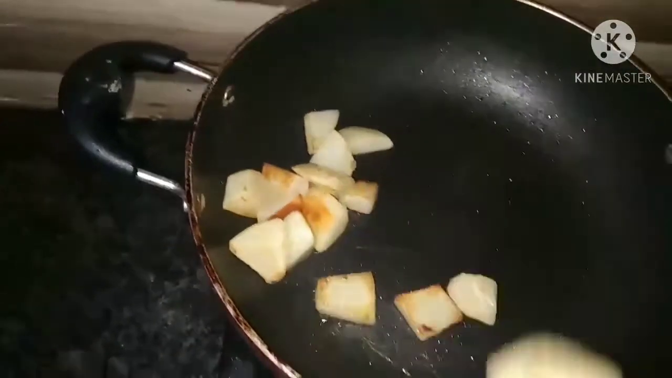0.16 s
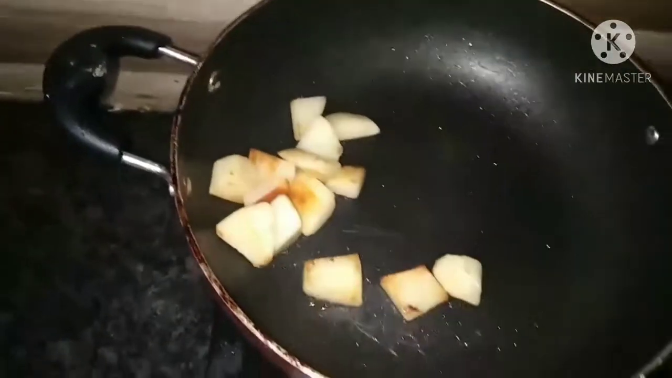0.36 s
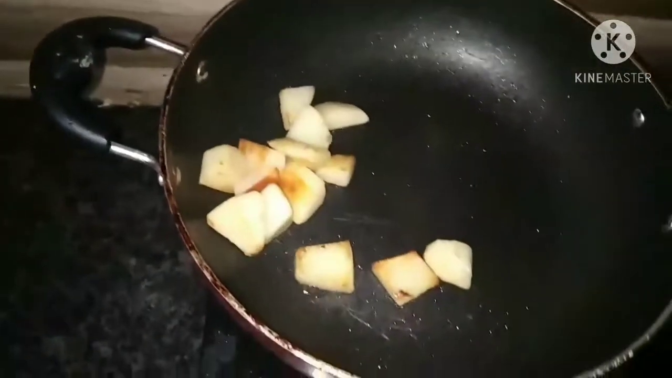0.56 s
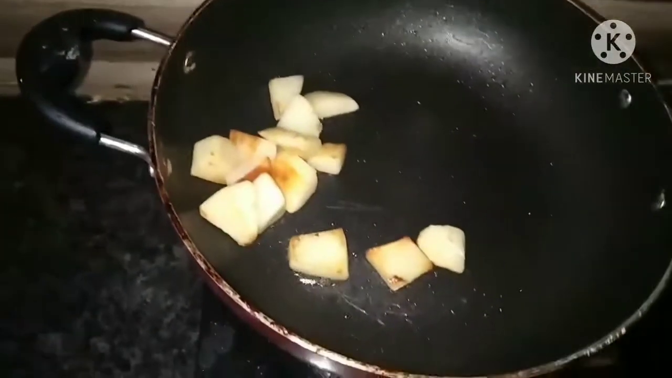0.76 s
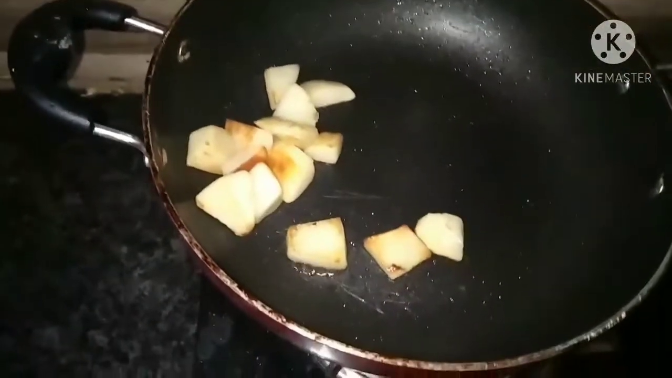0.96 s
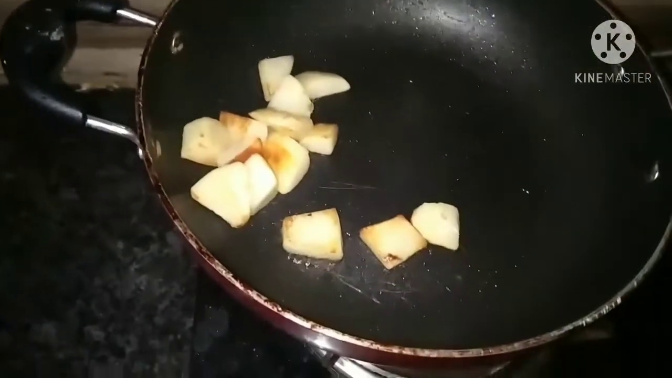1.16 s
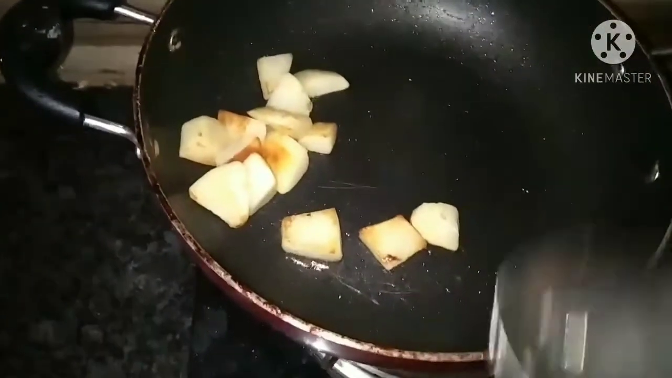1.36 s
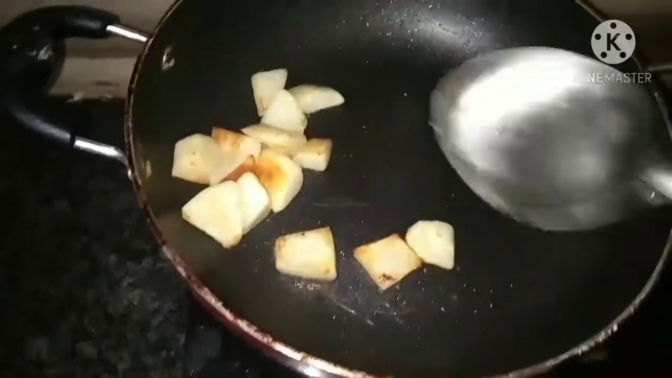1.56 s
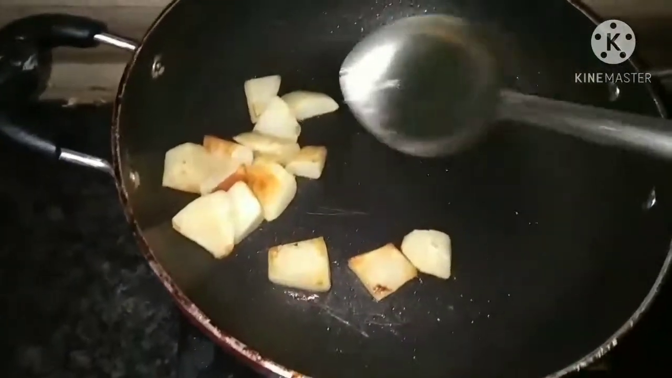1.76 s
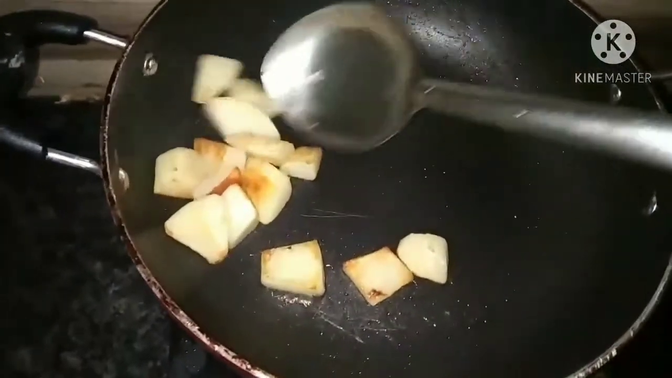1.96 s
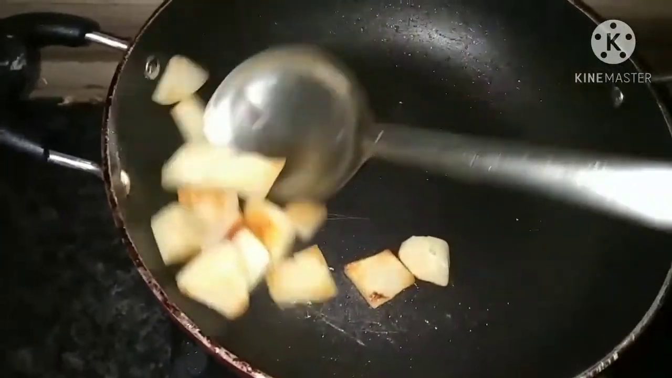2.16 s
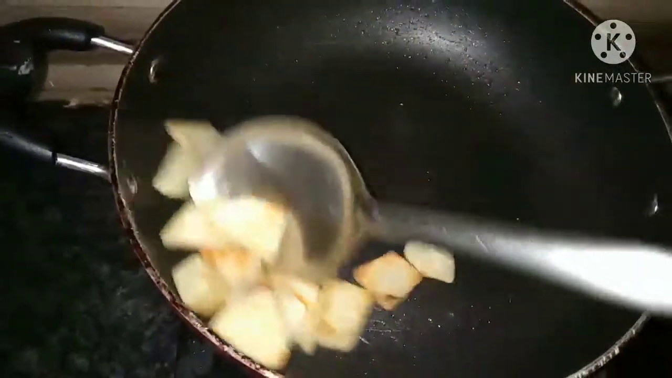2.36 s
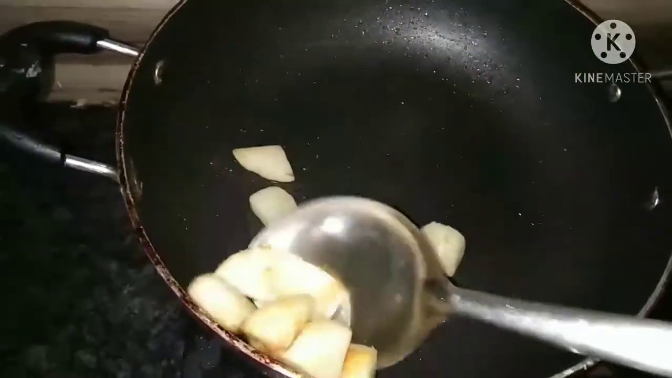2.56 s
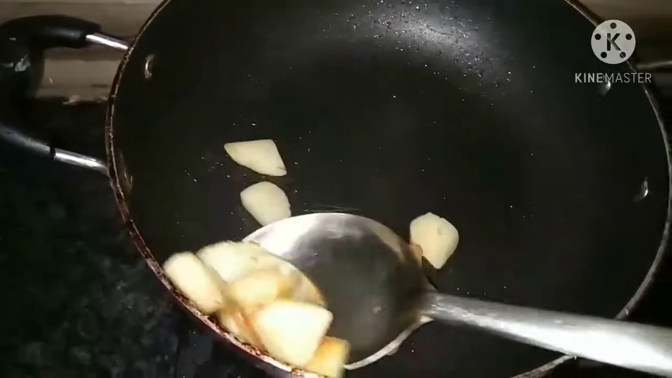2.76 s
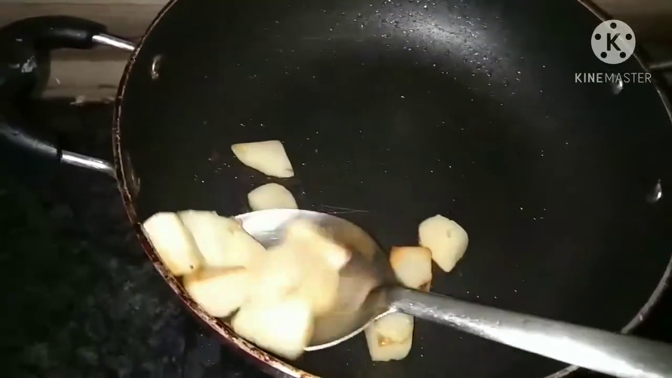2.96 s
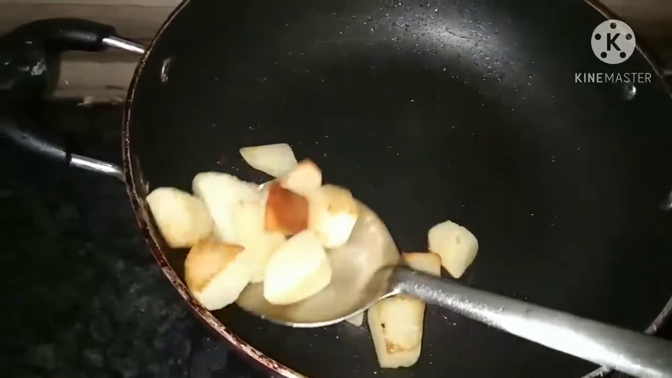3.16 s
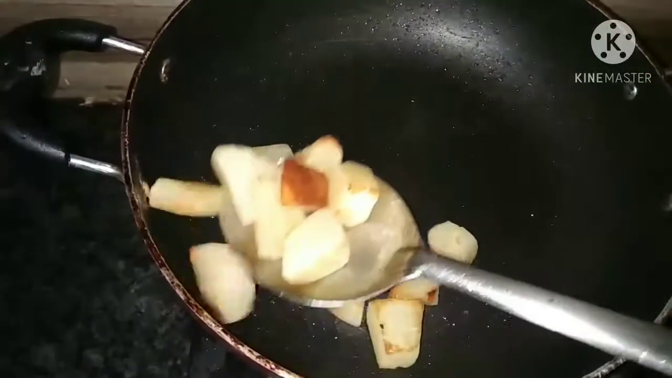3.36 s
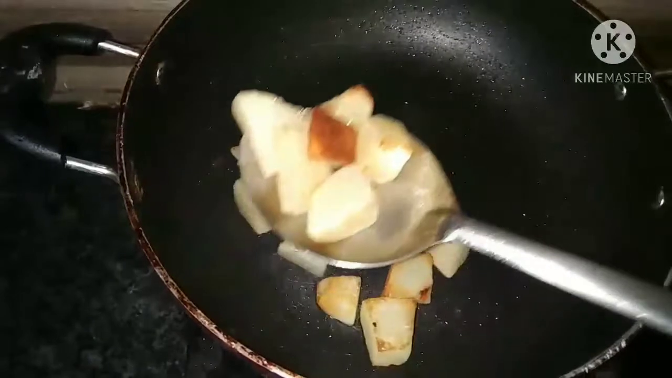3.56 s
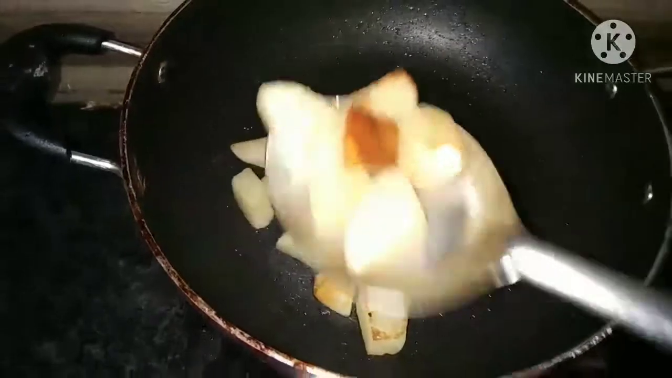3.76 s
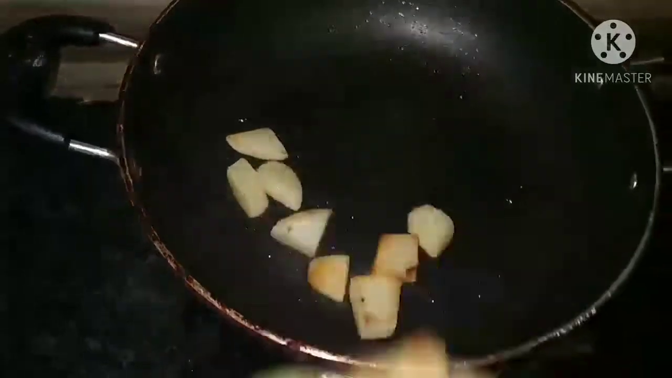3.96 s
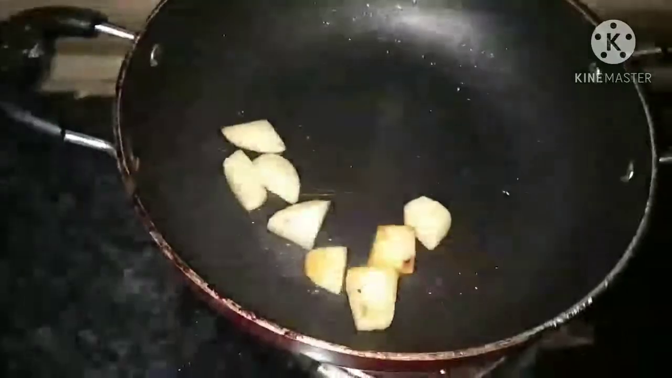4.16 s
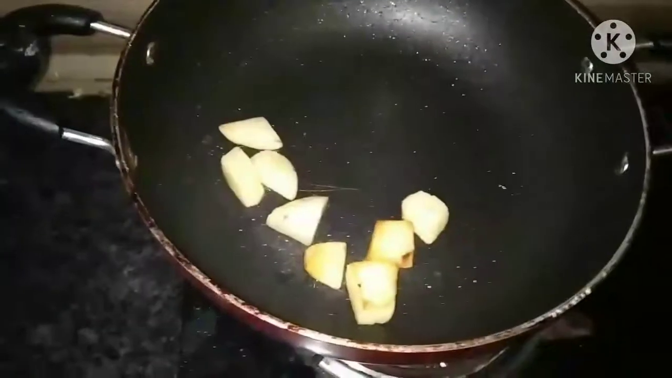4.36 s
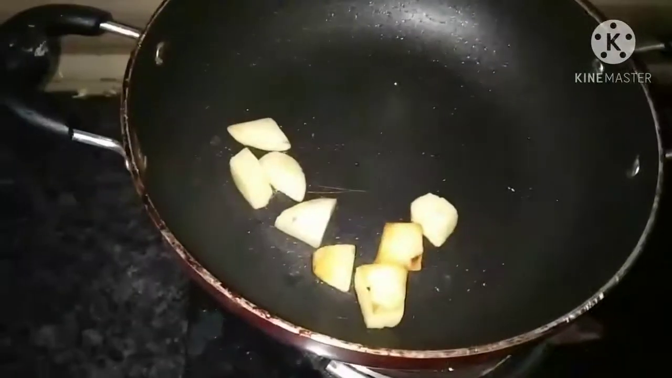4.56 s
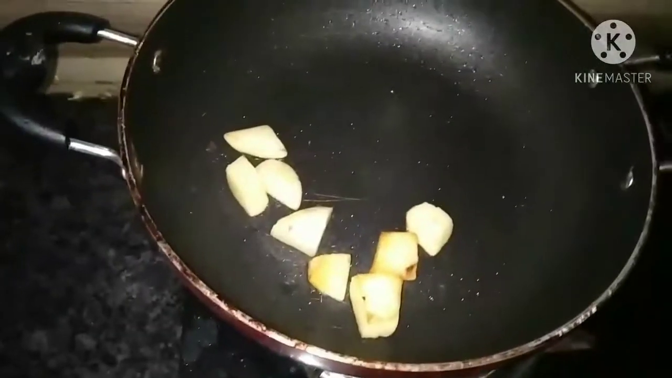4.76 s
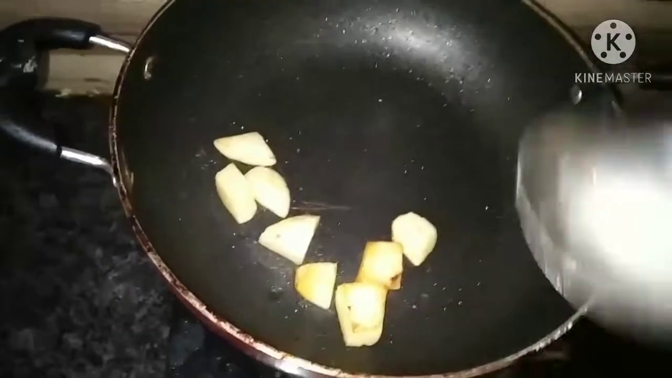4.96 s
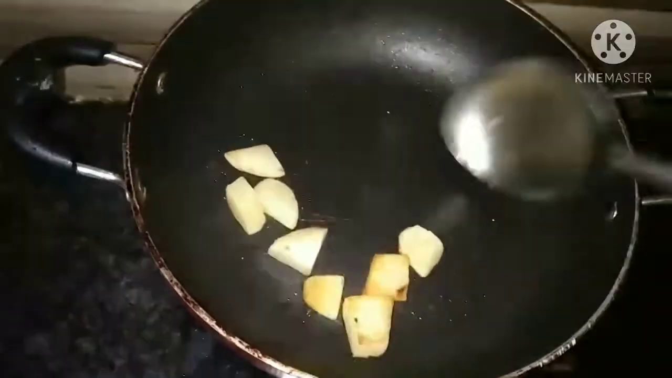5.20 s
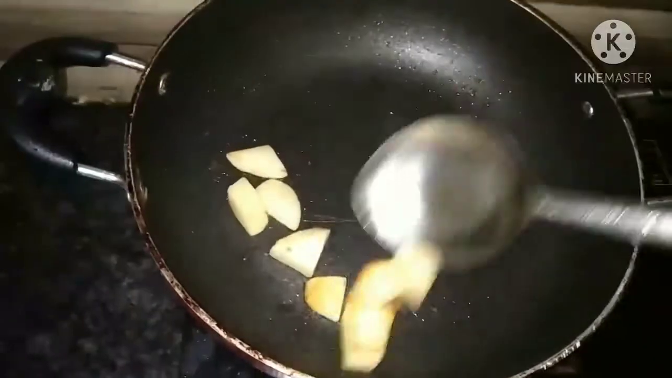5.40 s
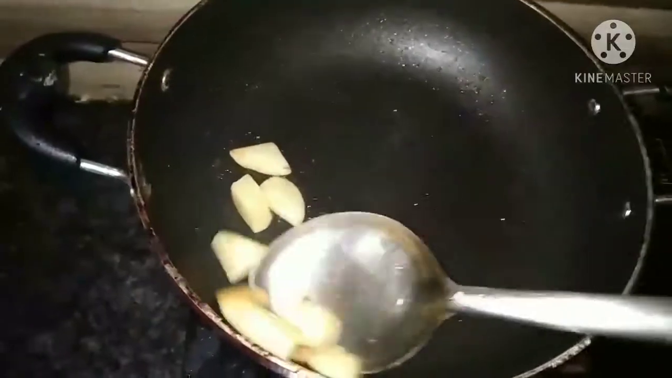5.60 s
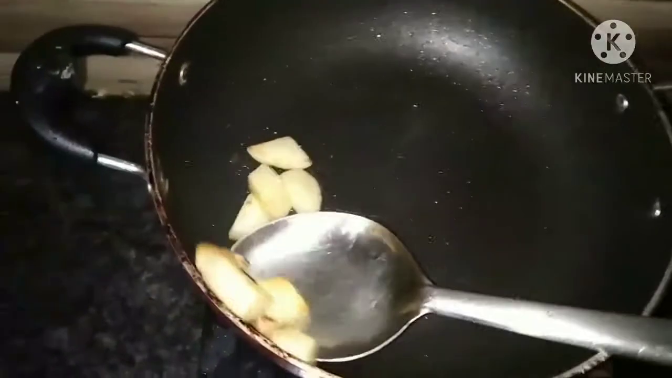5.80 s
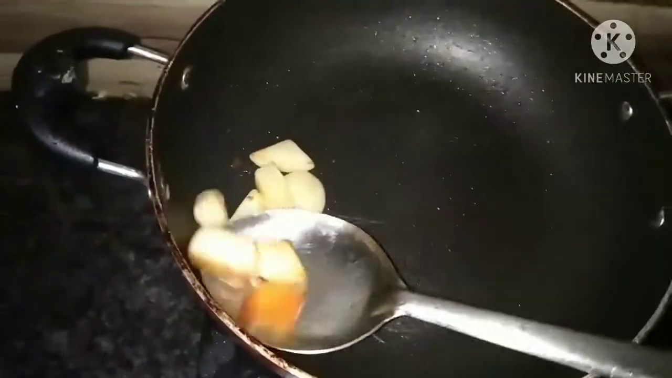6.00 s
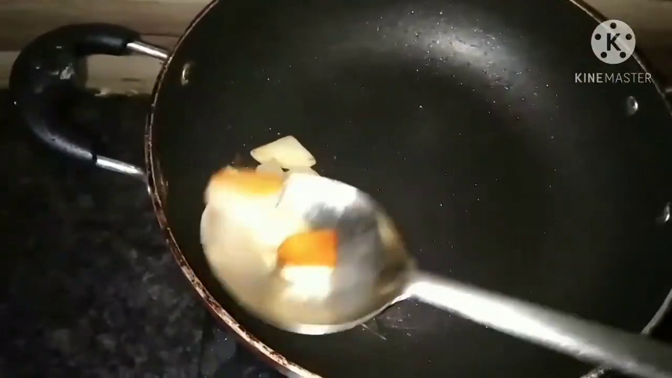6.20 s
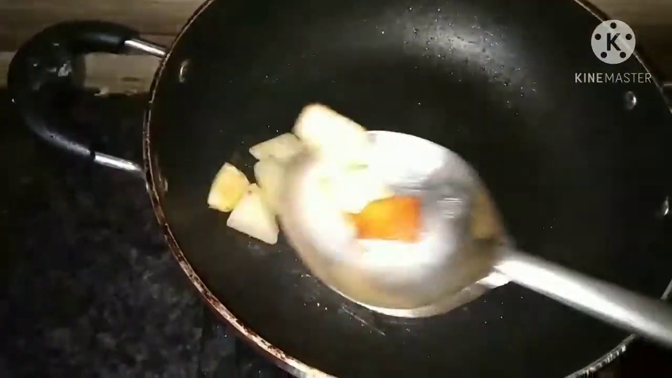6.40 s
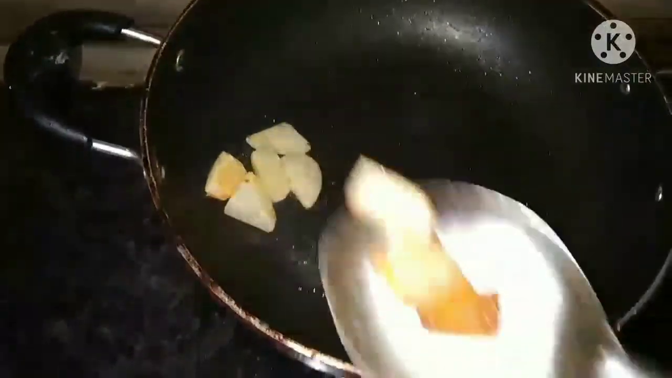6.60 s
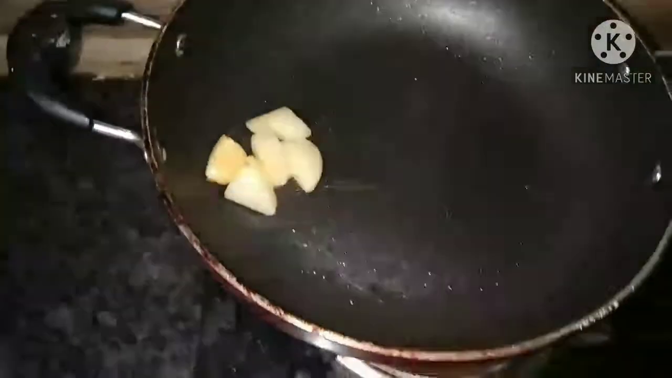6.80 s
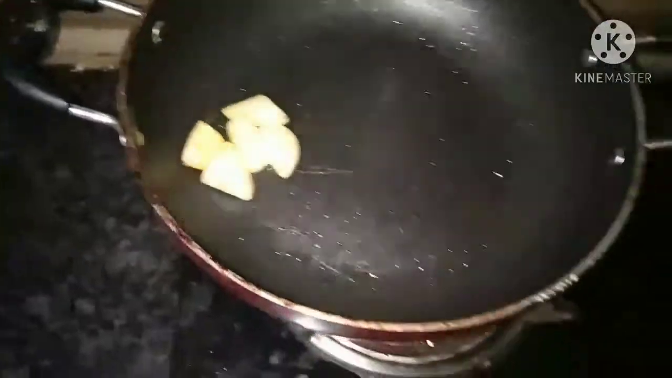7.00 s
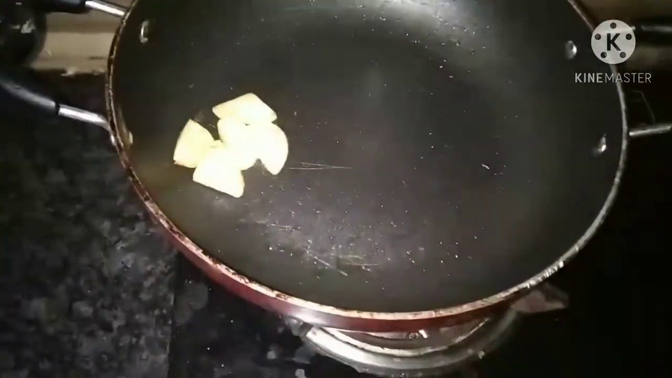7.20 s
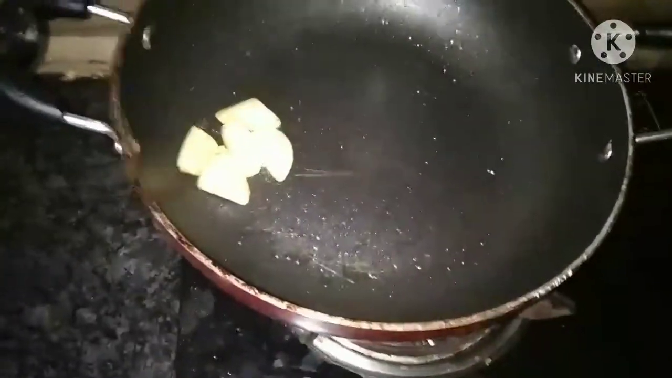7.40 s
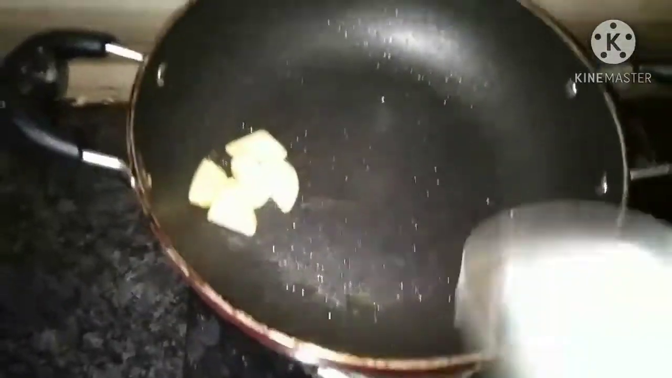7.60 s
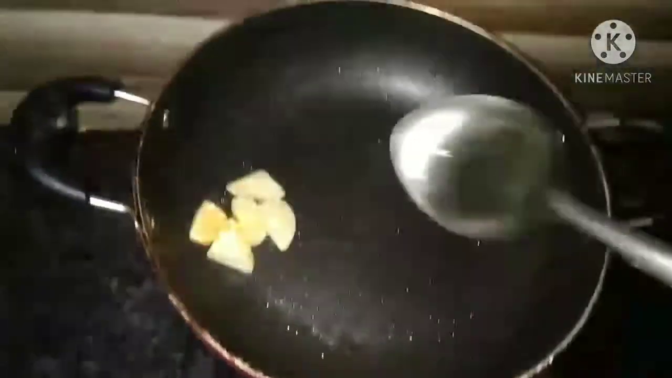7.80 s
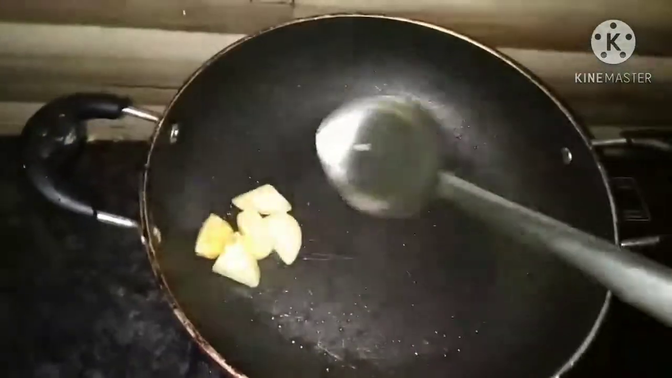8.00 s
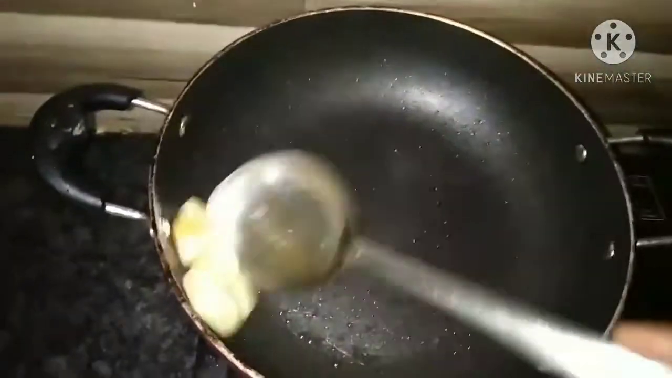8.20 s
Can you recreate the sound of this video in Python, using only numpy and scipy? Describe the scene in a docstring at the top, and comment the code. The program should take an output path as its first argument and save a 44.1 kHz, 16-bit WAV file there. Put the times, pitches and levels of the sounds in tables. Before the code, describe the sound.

Close to a wok in a small kitchen, potato pieces sizzle steadily over a faint low rumble. After soft bumps, a steel ladle knocks the pan, bounces and scrapes. Oil then spits in sharp cracks. The ladle strikes again with a rougher scrape, a faint high steam whistle sinks, the frying thins, and a last clank and scrape finish. Stereo, close microphone.

```python
"""Potato pieces sizzle in a wok: random clicks stand for bursting steam bubbles, over a low kitchen rumble.
Soft bumps come first, then at about 1.9 s a steel ladle lands, bounces and scrapes, ringing the pan's modes.
From about 3.5 s oil spits, each time a swelling hiss, a sharp crack and a spray of noise; at 5.3 s the ladle
lands again. At about 6.5 s leaking steam whistles, a sinking sine tone, and near 8 s the ladle lands once more.
Two microphone ports hear it all in stereo."""
import sys
import numpy as np
from scipy import signal
from scipy.fft import rfft, irfft
from scipy.io import wavfile
from scipy.ndimage import uniform_filter1d

SR = 44100
rng = np.random.default_rng(int(sys.argv[2]) if len(sys.argv) > 2 else 0)


def to_wav(s):
    """Save 16-bit WAV."""
    ch = np.atleast_2d(s).T  # columns
    pcm = np.round(np.clip(ch, -1, 1) * 32767)  # PCM
    wavfile.write(sys.argv[1], SR, pcm.astype(np.int16))


N = 363825
TIME = np.arange(N) / SR  # seconds


def undb(db):
    """Turn decibels into a plain gain."""
    return 10 ** (np.asarray(db) / 20)


def unit(x):
    """Scale a sound to an average strength (rms) of 1."""
    return x / np.sqrt(np.mean(x ** 2))


def colour(x, points, tilt_db=0., size=1024):
    """Filter through (Hz, dB) points without pre-echo; tilt_db is dB per octave, zero at 5000 Hz."""
    hz, db = np.transpose(points)
    octave = np.log2(np.maximum(np.arange(size // 2 + 1), .5) * SR / size)
    level_db = np.interp(octave, np.log2(hz + 1), db) + tilt_db * (octave - np.log2(5000))
    # folding the cepstrum (the transform of the log gain) puts all of the response after time zero
    cepstrum = irfft(np.log(undb(level_db)))
    cepstrum[1:size // 2] *= 2
    cepstrum[size // 2 + 1:] = 0
    response = irfft(np.exp(rfft(cepstrum)))
    filtered = signal.fftconvolve(np.atleast_2d(x), response[None], axes=1)
    return filtered[:, :x.shape[-1]].reshape(x.shape)


def band(x, lo_hz, hi_hz):
    """Keep the pitches between two limits."""
    return signal.sosfilt(signal.butter(2, [lo_hz, hi_hz], "band", fs=SR, output="sos"), x)


def curve(rows):
    """Gain that follows (s, dB) rows."""
    return undb(np.interp(TIME, *np.transpose(rows)))


def walk(rate):
    """A wandering random level: a new value every 1 / rate s, reached by a slide; spread near 1."""
    step = int(SR / rate)
    held = np.repeat(rng.standard_normal(N // step + 1), step)
    return 1.34 * uniform_filter1d(held, step)[:N]


def grains(rate, scatter_db):
    """Clicks at random moments, rate per second, a few much larger than the rest; rms 1."""
    hit = rng.random(N) < rate / SR
    return unit(hit * rng.standard_normal(N) * undb(scatter_db * rng.exponential(size=N)))


def strokes(start_s, hold_s, level_db, attack_s, t60_s):
    """Gain of events that rise, hold and die away by 60 dB in t60_s; their powers add."""
    power = np.zeros(N)
    for start, hold, db in zip(start_s, hold_s, level_db):
        t = TIME - start
        fade_db = 60 * np.maximum(t - attack_s - hold, 0) / t60_s
        power += (undb(db - fade_db) * np.clip(t / attack_s, 0, 1)) ** 2
    return np.sqrt(power)


# frying calms as pieces leave the pan and flares when they are stirred; relative levels: start_s, level_db
FRYING_LEVELS = [(0.0, -39.5), (2.57, -39), (3.01, -40), (3.33, -41), (3.63, -40), (4.52, -41), (5.08, -42),
                 (5.45, -39), (5.81, -41), (6.41, -45.5), (6.64, -44), (6.85, -45), (7.9, -47),
                 (8.25, -42.5)]
# tone of the bursting bubbles, also used for the spray of spits: pitch_hz, level_db (per Hz)
FRYING_TONE = [(940, -38.5), (1600, -8.5), (1840, -15.5), (2160, -8.5), (2660, -11), (2880, -7.5),
               (3170, -4), (4020, -7), (4380, -3), (4960, -9), (6620, -5.5), (8460, -0.5), (10200, -7),
               (13000, -8)]


def sizzle():
    """Thousands of tiny steam bubbles burst across the pan; part reaches both ports alike."""
    shared, left, right = (grains(9000, 0.33) * undb(0.93 * walk(40)) for _ in range(3))
    both = colour(np.array([shared + 2.12 * left, shared + 2.04 * right]), FRYING_TONE)
    unsteady = undb(2.5 + .5 * walk(6.6))
    return unit(both) * unsteady * curve(FRYING_LEVELS), left


# ways the pan and ladle ring together: pitch_hz, ring_s (time to fall 60 dB), level_db (relative)
RING_MODES = [(267, 0.33, -18), (374.7, 0.13, -10.5), (473, 0.02, -20), (565, 0.09, -12), (837.2, 0.14, -8),
              (877, 0.39, -17.5), (916, 0.22, -14), (1245, 0.036, -37), (1415, 0.083, -6),
              (1458, 0.067, -5), (1967, 0.039, -15), (2170, 0.032, -10.5), (2360, 0.076, -11),
              (2674, 0.02, -4), (2940, 0.024, -25), (3460, 0.013, -37), (3621, 0.063, -8.5),
              (3990, 0.044, -1.5), (4700, 0.14, -15.5), (5150, 0.073, -2), (5482, 0.073, -5.5),
              (6400, 0.06, -13), (7000, 0.026, -8), (7320, 0.073, -7.5), (7834, 0.052, -3),
              (8760, 0.046, -7), (9800, 0.052, -8.5), (9730, 0.044, -11.5), (11500, 0.048, -16),
              (13100, 0.065, -16)]
# pitches that split the modes into seven families: pitch_hz
FAMILY_LIMITS = [700, 1100, 1700, 2500, 3200, 6000]
# how hard the bubbles shake each family, lowest family first: level_db
BUBBLE_PUSH = [-28.5, -22.5, -18, -21.5, -15.5, -21, -15.5]


def metal(frying, bumps):
    """Blows, stick-slip scraping, tumbling pieces and the frying all drive the same ringing modes."""
    at, blows = blow_forces()
    rubbing = rubbing_forces(bumps)
    # no two blows start a mode alike
    scatter = np.exp((0.033 + 1j) * rng.standard_normal((len(at), len(RING_MODES))))
    ringing = np.zeros((2, N))
    for k, (hz, ring_s, db) in enumerate(RING_MODES):
        family = np.searchsorted(FAMILY_LIMITS, hz)
        pole = np.exp((2j * np.pi * hz - np.log(1000) / ring_s) / SR)
        # the moving contact feeds the fine upper modes weakly and by turns
        contact_db = (1.3 + 0.6 * family) * walk(22) - 5.9 * (hz > 3200)
        steady = rubbing[family] * undb(contact_db) + undb(BUBBLE_PUSH[family]) * frying
        force = np.sqrt(2 - 2 * abs(pole) ** 2) * steady.astype(complex)
        force[at] += blows[family] * scatter[:, k]
        ring = undb(db) * signal.lfilter([1], [1, -pole], force)
        # higher modes radiate in finer patterns, so the ports hear them at different phases
        turn = np.exp(.7j * (-1) ** k * np.sqrt(hz / 1000))
        ringing += np.array([ring * turn, ring]).imag
    clack = clacks()
    clack = band(clack, 780, 7000) + band(clack, 6400, 14000) * undb(-7.0)
    # a small pan radiates hardly any bass
    return band(ringing + clack + rasp(rubbing), 395, 16000)


# ladle blows and bounces; the spot struck favours some modes:
# start_s, level_db, low_extra_db (below 1100 Hz), middle_extra_db (1700-3200 Hz), high_extra_db (above 3200 Hz)
LADLE_BLOWS = [(1.875, -5, -4.5, -3, -11.5), (1.925, -23.5, 6, 2, -15), (2.012, -26, 1, -2, -17),
               (2.295, -34, -12, 5, -5), (3.055, -31.5, -12, 1, -16), (5.348, -3, -3, -10, -7),
               (5.427, -20, -2, -4, -19), (5.49, -17.5, 3, -2, -19), (5.552, -21, -11, -1, -5),
               (5.581, -25.5, -15, 4, -7), (5.617, -20, -23, 12.5, -7), (5.784, -30.5, -1, -6, 2),
               (7.986, -4, -6.5, -1.5, -4), (8.044, -13, -2, 2, -9)]
RING_DB, CLACK_DB = -6, -14.5  # what a blow gives to the modes and to its short clack


def blow_forces():
    """A blow is one sudden push; returns its sample and its strength for each family of modes."""
    start_s, blow_db, low_db, middle_db, high_db = np.transpose(LADLE_BLOWS)
    spot_db = [low_db - 7.0, low_db, 0, middle_db, middle_db, high_db - 1.0, high_db + 3.0]
    return (start_s * SR).astype(int), [undb(blow_db + RING_DB + more_db) for more_db in spot_db]


def clacks():
    """The contact of each blow gives a short burst of noise."""
    out, t = np.zeros(N), TIME[:2000]
    for start_s, blow_db, *_ in LADLE_BLOWS:
        i = int(start_s * SR)
        out[i:i + 2000] += rng.standard_normal(2000) * undb(blow_db + CLACK_DB - 60 * t / 0.063)
    return out


# ladle dragged over the pan, one row a stroke: start_s, hold_s, level_db (relative), low_extra_db,
# edge_extra_db (ladle edge), edge_pitch_hz, high_extra_db
LADLE_DRAGS = [(1.895, 0.017, -45.5, 10, -2, 2300, 1), (1.916, 0.067, -43.5, 2, -5, 2100, -8),
               (1.995, 0.069, -37, 2.5, 0, 2240, -11), (2.192, .04, -58, 8, 3, 2430, 7),
               (2.263, 0.037, -49, -15, 0, 2700, 5.5), (2.377, 0.047, -47.5, 1, -2, 2700, -4),
               (2.439, 0.12, -48.5, -10, 5.5, 2740, 0), (2.637, 0.11, -58.5, -7, 8, 2720, -5),
               (2.742, 0.075, -56.5, -6, 12.5, 2700, 3), (2.86, 0.19, -59.5, 3, 10.5, 2560, -9),
               (5.351, 0.037, -28.5, 0, -10, 2100, -9.5), (5.408, 0.031, -25, -15, -9, 2100, -7.5),
               (5.45, 0.037, -30, 1, -3, 2330, -2.5), (5.555, 0.039, -32, -15, -12, 2400, -9.5),
               (5.601, 0.036, -37, -2, 11.5, 2500, 0.5), (5.774, 0.016, -46, 9.5, 13, 2560, -2),
               (5.842, 0.19, -56.5, 3, 6, 2630, -9), (7.997, 0.017, -34.5, 12.5, -15, 2200, -7),
               (8.038, 0.023, -34.5, 10.5, 2, 2230, -5), (8.096, 0.11, -40.5, 1.5, -4, 2360, -7),
               (8.182, 0.037, -32.5, -0.5, -1.5, 2400, -12), (8.22, 0.026, -41, 7, 12, 2620, 4.5)]
DRAG_ATTACK_S, DRAG_T60_S = 0.0067, 0.18
EDGE_FAMILIES_HZ, EDGE_FALL_DB_PER_OCTAVE = (2100, 2700), 25


def rubbing_forces(bumps):
    """The dragged ladle sticks and slips in tiny jerks; bumps push the lowest family instead."""
    slips = unit(grains(4000, 0.3) * undb(1.0 * walk(90)))
    start_s, hold_s, drag_db, low_db, edge_db, edge_hz, high_db = np.transpose(LADLE_DRAGS)
    # a family is driven less the further it lies from the pitch of the edge
    edge = [edge_db - EDGE_FALL_DB_PER_OCTAVE * abs(np.log2(hz / edge_hz)) for hz in EDGE_FAMILIES_HZ]
    forces = [bumps]
    for more_db in [low_db, 0, *edge, high_db, high_db + 3]:
        forces.append(slips * strokes(start_s, hold_s, drag_db + more_db, DRAG_ATTACK_S, DRAG_T60_S))
    return forces


def rasp(rubbing):
    """Countless small modes blur into a rasp between the clear ones."""
    out = np.zeros(N)
    for family, lo_hz, hi_hz, db in [(2, 990, 1020, -9.5), (3, 1790, 2220, 10.0), (4, 2426, 2890, 7.5),
                                     (5, 3100, 5240, 6.5), (6, 5500, 10900, -9.0)]:
        out += band(rubbing[family], lo_hz, hi_hz) * undb(db)
    return out


# pieces tumbling on pan and plate: start_s, hold_s, level_db (relative)
PIECE_BUMPS = [(.66, .15, -59), (0.835, .04, -53.5), (1.885, 0.31, -51), (2.29, .025, -45),
               (2.433, 0.19, -47), (2.74, .28, -51), (3.037, 0.04, -45.5), (3.467, 0.12, -56),
               (5.342, 0.0077, -30.5), (5.594, 0.37, -48.5), (5.924, 0.22, -52), (7.98, 0.026, -51),
               (8.14, 0.029, -46), (8.21, .05, -54)]


def tumble():
    """Soft pieces rub and bump the pan: dull pushes."""
    pushes = unit(grains(400, 1.8) + 0.63 * rng.standard_normal(N))
    return pushes * strokes(*np.transpose(PIECE_BUMPS), attack_s=0.0077, t60_s=0.3)


# oil spitting: start_s, crack_db (relative), spray_db (against the crack), tilt_db (per octave)
OIL_SPITS = [(2.2638, -12, -14, 4), (3.539, -21, -11, 7), (3.5553, -32, 1, 9), (3.5972, -6, -19, 4.5),
             (3.6153, -12.5, -10.5, 2), (3.649, -9, -16, 1), (3.6574, -12.5, -11.5, -2),
             (3.6908, -8.5, -13, -0.5), (3.8384, -22, -12, 2), (3.8575, -7.5, -12.5, -3),
             (3.9977, -14.5, -9.5, -3), (4.0088, -18, -18, 9), (4.087, -23, -10, 5.5),
             (4.143, -20, -10.5, -3), (4.1809, -9, -14.5, -0.5), (4.2642, -16, -12, -0.5),
             (4.39, -15, -14, 2.5), (4.429, -23, -9, -4), (4.541, -10.5, -15.5, 2.5),
             (4.778, -19.5, -12.5, -4), (5.151, -30.5, -1.5, 4.5), (5.5317, -7, -15, -4),
             (5.8644, -22, -13.5, 3)]
# tone of the sharp crack: pitch_hz, level_db
CRACK_TONE = [(1000, -20), (2500, -6), (8000, 0), (14000, -1)]
SWELL_S, CRACK_T60_S, SPRAY_T60_S = 0.00033, 0.00015, 0.049


def spits():
    """A drop of water explodes: a hiss swells into one sharp crack, then droplets spray."""
    out, t = np.zeros((2, N)), TIME[:8192]
    for start_s, db, spray_db, tilt_db in OIL_SPITS:
        noise = rng.standard_normal((4, len(t)))
        droplets = undb(3.5 * uniform_filter1d(noise[3], size=30) * np.sqrt(30))
        spray = (noise[0] + 1.57 * noise[1:3]) * droplets * undb(spray_db - 60 * t / SPRAY_T60_S)
        spray = colour(spray * np.minimum(t / SWELL_S, 1), FRYING_TONE, tilt_db)
        crack = np.sign(noise[0]) * undb(3 - 60 * (t - SWELL_S) / CRACK_T60_S) * (t >= SWELL_S)
        crack = colour(crack, CRACK_TONE, tilt_db + 1.5)
        i = int(start_s * SR)
        out[:, i:i + len(t)] += undb(db) * (spray + crack)
    return band(out, 570, 12600)


WHISTLE_S, WHISTLE_HOLD_S, WHISTLE_DB = 6.46, 0.24, -47.5
WHISTLE_START_HZ, WHISTLE_END_HZ, WHISTLE_SINK_S = 9150, 7360, 0.43


def whistle():
    """Steam leaks from under a piece: a thin, fluttering tone that sinks as the pressure falls."""
    pressure = np.exp(-np.maximum(TIME - WHISTLE_S, 0) / WHISTLE_SINK_S)
    hz = WHISTLE_END_HZ + (WHISTLE_START_HZ - WHISTLE_END_HZ) * pressure
    phase = 2 * np.pi * np.cumsum(hz * (1 + 0.00286 * walk(140))) / SR
    gain = strokes([WHISTLE_S], [WHISTLE_HOLD_S], [WHISTLE_DB], attack_s=0.036, t60_s=1)
    return np.sqrt(2) * np.sin(phase) * gain * undb(1.5 * walk(60))


# tone of the burner and house rumble: pitch_hz, level_db (per Hz, relative)
RUMBLE_TONE = [(15, -76), (25, -33), (64, -8.5), (97, -2), (199, -2), (232, -10), (338, -1.5), (852, 1.5),
               (1240, -4.5), (1380, -8), (1500, 2), (1950, -19), (3300, -120)]
RUMBLE_DB = -60


def kitchen():
    """Burner and house rumble: slowly wavering noise, partly shared by the two ports."""
    shared, left, right = rng.standard_normal((3, N)) * undb(1.5 * walk(4.3))
    both = np.array([shared + 0.95 * left, shared + 0.24 * right])
    return unit(colour(both, RUMBLE_TONE, size=8192)) * undb(RUMBLE_DB)


ROOM_T60_S, ROOM_DB = 0.13, -6


def walls(near):
    """Short kitchen reverberation: fading noise as the echo pattern, different at each port."""
    t = TIME[:SR // 3]
    tail = rng.standard_normal((2, len(t))) * undb(-60 * t / ROOM_T60_S) * (t > .002)
    tail /= np.sqrt((tail ** 2).sum(1, keepdims=True))
    return near + undb(ROOM_DB) * signal.fftconvolve(near, tail, axes=1)[:, :N]


def ports(x, balance, lag):
    """The two microphone ports hear a place with their own colour; the left is lag samples later."""
    hz, db = np.transpose(balance)
    left = colour(x[0], np.transpose([hz, db / 2]))
    right = colour(x[1], np.transpose([hz, -db / 2]))
    return np.array([np.roll(left, lag), right])


# how the ports differ for the food and for the ladle: pitch_hz, left_minus_right_db
FOOD_SIDES = [(60, -6), (110, 14.5), (200, 9), (380, 6), (700, -5), (1290, 0), (2380, -8), (4400, -4.5),
              (8120, -3.5), (15000, -0.5)]
LADLE_SIDES = [(60, -9), (110, 14), (200, 16), (380, 8), (700, 2), (1290, -7), (2380, -8), (4400, 0),
               (8120, -6), (15000, 10)]


def scene():
    """Add the ladle on the pan to the food and the kitchen, each heard from its own place."""
    fry, bubbles = sizzle()
    bumps = tumble()
    dull_bumps = band(bumps, 267, 670) * undb(2.0)
    ladle = walls(metal(bubbles * curve(FRYING_LEVELS), bumps) + dull_bumps)
    food = walls(spits() + whistle()) + fry + kitchen()
    return ports(ladle, LADLE_SIDES, lag=1) + ports(food, FOOD_SIDES, lag=5)


def record(dry):
    """Cut deep bass, round the loudest peaks and low-pass everything steeply at 14200 Hz."""
    bass_cut = signal.sosfilt(signal.butter(1, 40, "high", fs=SR, output="sos"), dry)
    rounded = np.tanh(1.07 * bass_cut) / 1.139
    low_pass = signal.ellip(12, .2, 80, 14200, fs=SR, output="sos")
    return signal.sosfilt(low_pass, rounded)


dry = scene()
out = record(dry)
to_wav(out)
```